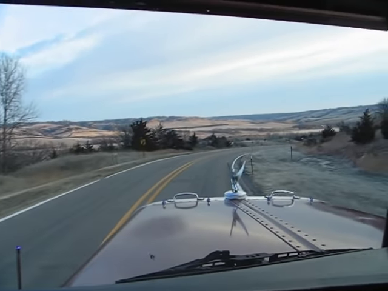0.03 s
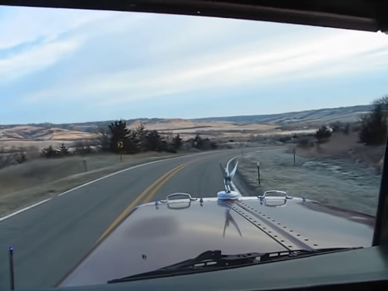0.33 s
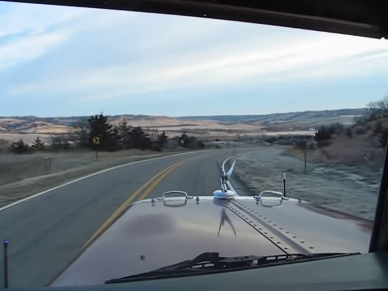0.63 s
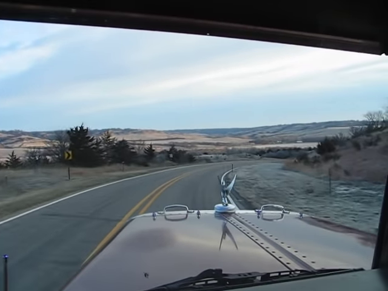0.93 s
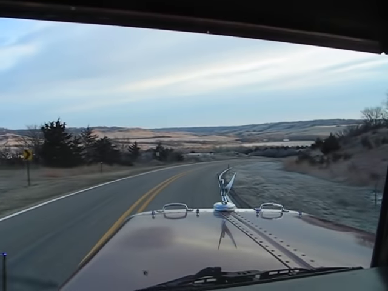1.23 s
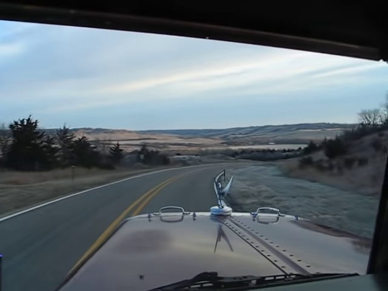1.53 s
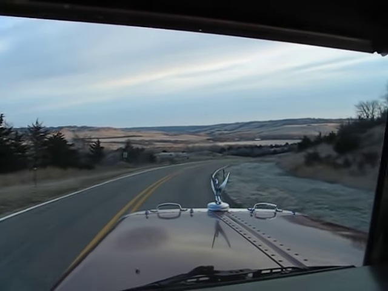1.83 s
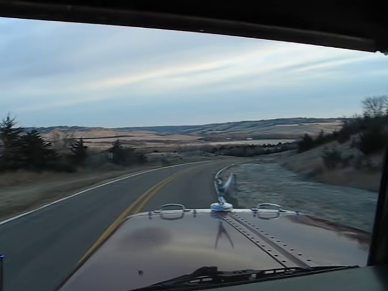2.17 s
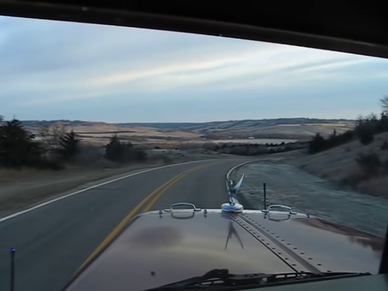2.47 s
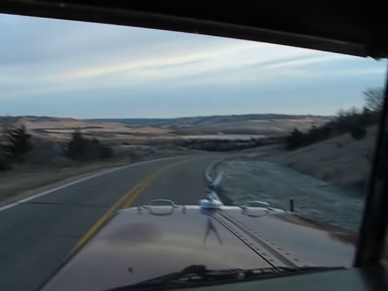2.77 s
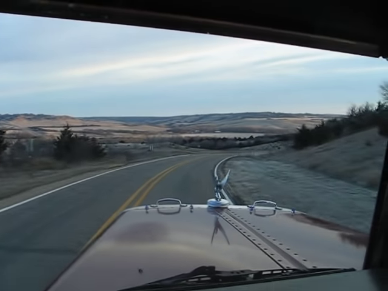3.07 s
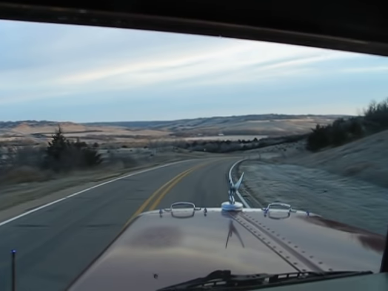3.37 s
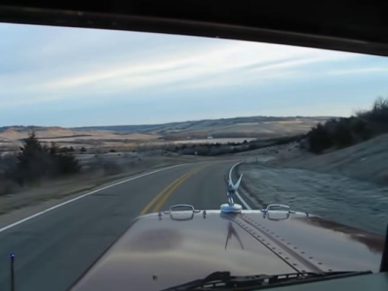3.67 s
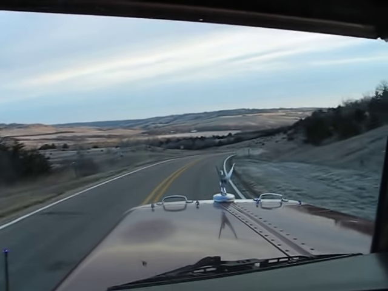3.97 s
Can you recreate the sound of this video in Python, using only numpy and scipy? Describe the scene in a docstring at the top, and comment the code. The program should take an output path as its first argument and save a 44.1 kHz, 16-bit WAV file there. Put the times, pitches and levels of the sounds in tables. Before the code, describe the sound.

A diesel truck's engine brake stutters loudly over road rumble, heard from inside the cab.

```python
"""Fast, stuttering barks: a six-cylinder diesel truck on its engine brake, heard from inside the cab.
Each cylinder dumps its squeezed air with a hiss and a sharp exhaust bark. The cylinders are unequal,
so the barks stutter once per engine cycle, then even out as the engine slows on the way downhill.
Under them are a low exhaust drone and the rumble of the road."""
import sys
import numpy as np
from scipy import signal
from scipy.fft import rfft, irfft, next_fast_len
from scipy.io import wavfile
from scipy.ndimage import uniform_filter1d, minimum_filter1d, map_coordinates

SR = 44100
rng = np.random.default_rng(int(sys.argv[2]) if len(sys.argv) > 2 else 0)


def output_pcm(signal):
    """Save a mono or channel-first signal as 16-bit PCM at the path in sys.argv[1].

    Samples are clipped to [-1, 1] before scaling.
    """
    pcm = np.clip(np.atleast_2d(signal).T, -1, 1) * 32767
    wavfile.write(sys.argv[1], SR, np.round(pcm).astype(np.int16))


N = 176400  # 4 seconds
CYLINDER_COUNT = 6
START_RATE_HZ, FIRST_BARK_S = 57.1575, .0053  # barks per second at the start; time of the first


def barks(times, db, split_hz=550, low_cut_hz=30):
    """Each burst of air makes the exhaust pipe and the cab ring. Stronger bursts sound brighter."""
    # tone of the exhaust as it reaches the cab: f/Hz, level/dB
    exhaust_tone = [(25, -23), (55, -11.5), (85, -21.5), (140, 6), (260, -4.5), (400, -4), (700, -11),
                    (1000, -14), (1650, -16), (2050, -29.5), (2450, -27), (2650, -41.5), (3300, -44),
                    (4200, -71.5), (9000, -74.5)]
    lows = lambda hz: 1 / (1 + (hz / split_hz) ** 4)
    cylinders = []
    for c in range(CYLINDER_COUNT):
        own = slice(c, None, CYLINDER_COUNT)  # every sixth bark
        thump = filtered(pulses(times[own], amp(0.18 * db[own])), lows)  # varies less than the crack
        crack = filtered(pulses(times[own], amp(db[own])), lambda hz: 1 - lows(hz))
        cylinders.append(thump + crack)
    low_cut = lambda hz: 1j * hz / (1j * hz + low_cut_hz)
    pipe = lambda hz: causal(along(exhaust_tone, hz) + ringing(hz)) * low_cut(hz)
    return amp(-12.5) * unit(filtered(cab_echoes(cylinders), pipe))


def releases(jitter_s=.00002, scatter_db=.45):
    """When each burst of air leaves its cylinder, and how strong it is in dB. Both vary a little."""
    # strength over time: t/s, then level/dB for each of the six cylinders in turn
    strengths = [(0, -2, -7.5, -10, -2.5, -15, -12), (1.098, -2.5, -7.5, -8, -1, -12, -11.5),
                 (1.502, 1, -5.5, -8, 0.5, -4, -14), (1.798, 1, -5, -5.5, -1.5, -6.5, -11.5),
                 (2.502, 5.5, -2.5, -2.5, 1, -3.5, -9.5), (3.05, 3, 1, 2.5, -5, -0.5, -9),
                 (3.898, 2, -2, -1, -3.5, -2, -5)]
    # each cylinder's own delay on the way to the exhaust pipe: t/s
    delays = [0, .00008, -.00005, .0003, .00008, -.00005]
    count = bark_count()
    bark = np.arange(int(count[-1]) + 1)
    cylinder = bark % CYLINDER_COUNT
    time_error, level_error = rng.standard_normal((len(bark), 2)).T
    times = FIRST_BARK_S + np.interp(bark, count, np.arange(N) / SR)
    times += np.take(delays, cylinder) + jitter_s * time_error
    table_times, *columns = np.transpose(strengths)
    levels = np.array([np.interp(times, table_times, column) for column in columns])
    return times, levels[cylinder, bark] + scatter_db * level_error


def bark_count(slowing_hz_per_s=.87452, easing_hz_per_s2=.0946):
    """A running count of the barks, as the engine slows more and more gently."""
    t = np.arange(N) / SR
    return np.cumsum(START_RATE_HZ - slowing_hz_per_s * t + easing_hz_per_s2 * t ** 2) / SR


def ringing(hz):
    """Pipe and cab boost some pitches and swallow others; gives the change in dB."""
    # peaks and dips: f/Hz, width/Hz, level/dB
    resonances = [(139.5, 5.6, 13.5), (168, 14, -5.5), (204.3, 11, 6), (378.6, 22, 5.5), (434, 12.5, 5),
                  (461.3, 5.6, -7.5), (561, 30, -11), (646, 16, 5.5), (722.7, 35, 7.5), (834, 33.5, 5),
                  (946, 6, -5.5), (1208, 23, -6), (1300, 91, 0.5), (1493, 44, -9.5)]
    return sum(db * np.exp(-.5 * ((hz - f) / width) ** 2) for f, width, db in resonances)


def cab_echoes(cylinders, tail_above_hz=340):
    """The barks plus their echoes along the exhaust pipe. Each cylinder gets its own tail of echoes in the cab."""
    # first echoes in the pipe: delay/s, gain
    pipe_echoes = [(.00257, -0.094), (.00465, 0.075), (.0058, 0.13), (.00924, 0.24), (0.0143, 0.097)]
    bounces = lambda hz: 1 + sum(gain * np.exp(-2j * np.pi * hz * delay) for delay, gain in pipe_echoes)
    early = filtered(sum(cylinders), bounces)
    tails = sum(map(echo_tail, cylinders))
    late = filtered(tails, lambda hz: hz ** 2 / (hz ** 2 + tail_above_hz ** 2))
    return early + amp(-7.5) * late


def echo_tail(x, fade_s=0.098):
    """Many tiny echoes blur into a tail that drops 60 dB in fade_s."""
    t = np.arange(SR // 8) / SR
    tail = rng.standard_normal(len(t)) * np.exp(-np.log(1000) * t / fade_s)
    return signal.fftconvolve(x, tail / np.linalg.norm(tail))[:N]


def valve_hiss(times, db, lead_s=.008, growth_db_per_s=0.77):
    """An opening valve hisses from just before each bark, louder as the brake bites."""
    # tone of the hiss: f/Hz, level/dB
    hiss_tone = [(1000, -4), (3200, 5), (4200, -1), (5200, -3), (6300, -0.5), (7500, -3.5), (9000, -8),
                 (10200, -16), (11200, -29)]
    # how well each cylinder's hiss carries into the cab: level/dB
    reach = [0.5, -1, -1, 2, -2.5, -7.5]
    sizes = amp(db + growth_db_per_s * times + np.resize(reach, len(times)))
    loudness = puffs(times - lead_s, sizes, attack_s=0.0018, hold_s=.013, decay_s=0.009)
    return amp(-48.5) * noise(hiss_tone) * loudness


def pipe_rasp(times, db):
    """Swirling air rasps in the pipe after each bark."""
    # tone of the swirling air: f/Hz, level/dB
    rasp_tone = [(100, -15.5), (400, -2.5), (700, -3.5), (1000, -9.5), (1700, -3.5), (2450, -10),
                 (2700, -19.5), (3300, -23), (4200, -40.5), (9000, -76.5)]
    rasp = noise(rasp_tone) * puffs(times, amp(db), attack_s=0.00035, hold_s=0, decay_s=0.016)
    return amp(-29.5) * unit(filtered(rasp, lambda hz: causal(ringing(hz))))


def exhaust_drone(lag_s=0.0062, waver_hz=12, waver_db=.25):
    """The exhaust booms in the cab at twice the bark rate, wavering slightly in loudness."""
    # loudness of the drone: t/s, level/dB
    drone_levels = [(0, -12.5), (.6, -13.5), (1.3, -13.5), (2.2, -14), (3.2, -16), (4, -17.5)]
    t = np.arange(N) / SR
    count = bark_count() - START_RATE_HZ * (FIRST_BARK_S + lag_s)
    tone = np.sqrt(2) * np.cos(2 * np.pi * 2 * count)
    waver = map_coordinates(rng.standard_normal(N // 100), [t * waver_hz], mode="mirror")
    return amp(np.interp(t, *np.transpose(drone_levels)) + waver_db * waver) * tone


def road_rumble(fall_db_per_s=1.4):
    """Tyres and wind rumble, growing quieter as the truck slows."""
    # tone of road and wind in the cab: f/Hz, level/dB
    road_tone = [(8, -2), (15, 3.5), (25, -1.5), (33, -10), (50, 0.5), (68, -12), (82, -5), (100, -6),
                 (140, -7), (200, -16), (255, -13.5), (340, -14), (490, -15.5), (570, -26), (750, -21),
                 (1500, -24.5), (2500, -42.5), (4000, -57), (8000, -65.5), (11000, -81.5)]
    return amp(-19.5 - fall_db_per_s * np.arange(N) / SR) * noise(road_tone)


def amp(db):
    """Turns decibels into a number to multiply by."""
    return 10 ** (np.asarray(db) / 20)


def unit(x):
    """Scales a sound to an average size (rms) of 1."""
    return x / np.sqrt(np.mean(x ** 2) + 1e-20)


def along(points, hz):
    """Reads between the rows of an f/Hz, level/dB table, on a pitch-like (log) scale."""
    f, db = np.transpose(points)
    return np.interp(np.log(hz + 1), np.log(f + 1), db)


def filtered(x, response):
    """Multiplies each frequency in a sound by response(hz)."""
    size = 2 * next_fast_len(N // 2 + SR // 2)
    return irfft(rfft(x, size) * response(np.fft.rfftfreq(size, 1 / SR)), size)[:N]


def causal(db):
    """A filter with this dB shape that rings only after it is struck."""
    log_response = irfft(db * np.log(10) / 20)
    n = np.arange(len(log_response))
    forward_only = np.where(n == 0, 1, 2 * (n < len(n) // 2))
    return np.exp(rfft(log_response * forward_only))


def noise(tone):
    """Steady noise of average size 1, shaped by a tone table."""
    return unit(filtered(rng.standard_normal(N), lambda hz: amp(along(tone, hz))))


def pulses(times, sizes, half_width=8):
    """Sharp clicks at exact times, even between two samples."""
    at = times[:, None] * SR
    taps = np.floor(at).astype(int) + np.arange(1 - half_width, half_width + 1)
    shape = np.sinc(taps - at) * np.sinc((taps - at) / half_width)
    return np.bincount(np.clip(taps, 0, N).ravel(), (sizes[:, None] * shape).ravel(), N + 1)[:N]


def puffs(times, sizes, attack_s, hold_s, decay_s):
    """A loudness curve of average size 1 that swells, holds and dies away at each time."""
    t = np.arange(SR // 8) / SR
    shape = (1 - np.exp(-t / attack_s)) * np.exp(-np.maximum(t - hold_s, 0) / decay_s)
    return unit(signal.fftconvolve(pulses(np.maximum(times, 0), sizes), shape)[:N])


def scene():
    """The engine brake over the drone and the road, in one channel."""
    times, db = releases()
    brake = barks(times, db) + valve_hiss(times, db) + pipe_rasp(times, db)
    return (brake + exhaust_drone() + road_rumble())[None]


def record(dry):
    """A fast limiter turns the loudest barks down, then the highest treble is cut off."""
    ceiling, smooth_s, top_hz = .97, .003, 11200
    size = int(smooth_s * SR)
    gain = minimum_filter1d(ceiling / np.maximum(np.abs(dry[0]), ceiling), 2 * size)
    gain = uniform_filter1d(uniform_filter1d(gain, size), size)
    return filtered(dry[0] * gain, lambda hz: hz < top_hz)[None]


dry = scene()
out = record(dry)
output_pcm(out)
```